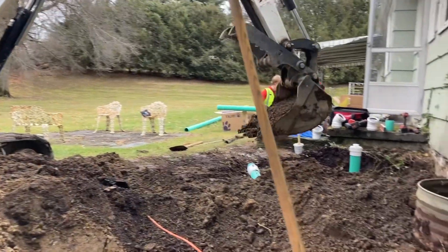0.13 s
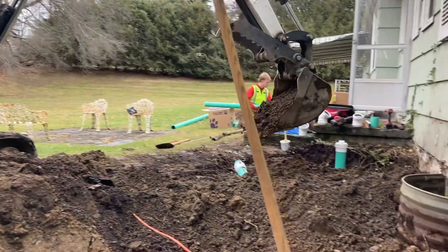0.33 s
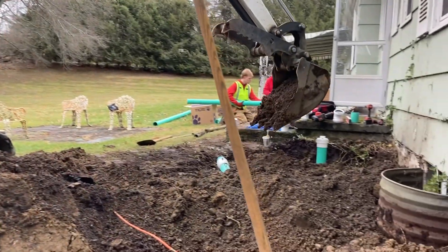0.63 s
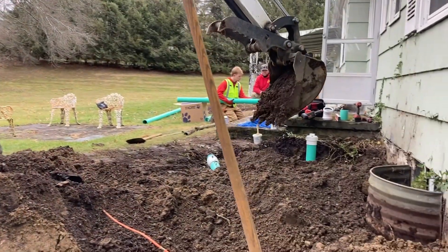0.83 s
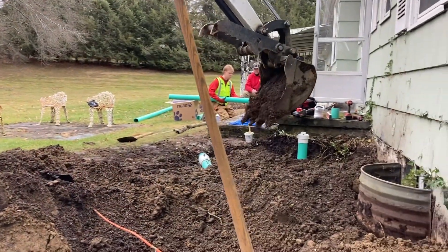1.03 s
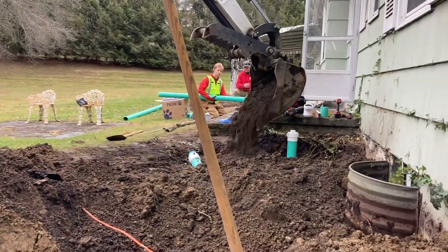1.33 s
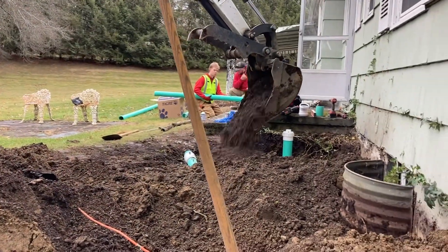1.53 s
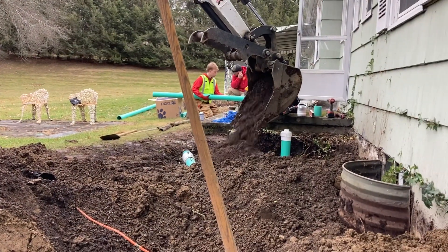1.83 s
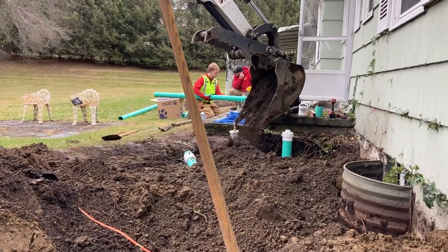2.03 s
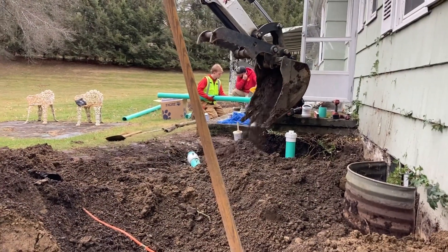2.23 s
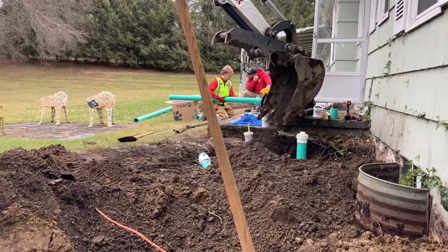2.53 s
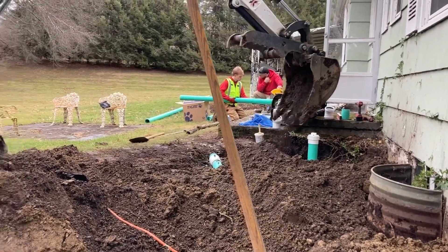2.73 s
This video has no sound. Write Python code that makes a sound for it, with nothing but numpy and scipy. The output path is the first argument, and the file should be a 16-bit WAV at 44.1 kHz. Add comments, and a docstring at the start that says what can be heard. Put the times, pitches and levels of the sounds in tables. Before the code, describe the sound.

A mini excavator's diesel engine runs throughout, with low unsteady boom, rumble, metallic clatter and a steady fan hum that rises slightly around 0.7-1.1 s. Bright hydraulic hiss and thin wavering whistles start almost at once, gaining a fast buzzing chatter from about 1 s. From 1.5 s damp soil patters onto a heap beside a house wall; heavy clods thud softly at 2.4-2.8 s.

```python
"""Mini excavator tipping soil

A mini excavator tips a bucket of soil beside a house wall. Its fan hums in steady tones over the boom of the
crank; noise bursts, housing drones and panel rings make the diesel rumble and clatter. Oil hisses and whistles
through a valve as flickering noise, with a chatter that deepens about a second in. Random clicks patter down
as soil, and a few heavy clods thud as short low rings with grit."""
import sys
import numpy as np
from scipy import signal
from scipy.fft import rfft, irfft
from scipy.io import wavfile
from scipy.ndimage import uniform_filter1d

SR = 44100
rng = np.random.default_rng(int(sys.argv[2]) if len(sys.argv) > 2 else 0)


def generate_wav(sig):
    """Save sig (samples, or channels by samples) to the path in sys.argv[1] as 16-bit PCM at SR."""
    pcm = np.round(np.clip(np.atleast_2d(sig).T, -1, 1) * 32767).astype(np.int16)
    wavfile.write(sys.argv[1], SR, pcm)


N = 127890
SIDES = np.array([[-1], [1]])  # left, right


def undb(db):
    """Decibels to gain."""
    return 10 ** (np.asarray(db) / 20)


def unit(x):
    """Scale to rms 1."""
    return x / np.sqrt(np.mean(x ** 2))


def curve(table):
    """The columns of a time table, sample by sample."""
    times, *cols = np.array(table, float).T
    return [np.interp(np.arange(N) / SR, times, c) for c in cols]


def by_pitch(table):
    """The columns of a frequency table, bin by bin."""
    hz, *cols = np.array(table, float).T
    bin_hz = np.arange(N // 2 + 1) * SR / N
    return [np.interp(np.log(bin_hz + 1), np.log(hz), c) for c in cols]


def colour(x, spectrum):
    """Filter by a spectrum; rms 1."""
    return unit(irfft(rfft(x) * undb(by_pitch(spectrum)[0]), N))


def walk(rate):
    """Random levels held 1 / rate s and smoothed twice; spread 1."""
    k = max(int(SR / rate), 1)
    held = np.repeat(rng.standard_normal(N // k + 2), k)
    return unit(uniform_filter1d(uniform_filter1d(held, k), k)[:N])


def ears(pair, table):
    """Two unrelated signals become left and right with a given balance, phase and likeness."""
    tilt_db, lead, likeness = by_pitch(table)
    likeness = np.clip(likeness, 0, 1)
    a, b = rfft(pair)
    both = np.sqrt(1 + likeness) * a + SIDES * np.sqrt(1 - likeness) * b
    return irfft(both * undb(SIDES * tilt_db / 2) * np.exp(-.5j * SIDES * lead), N)


def echoes(x, table):
    """Add delayed copies from nearby hard surfaces, scaled to leave the mean power gain at 1."""
    hz = np.arange(N + 1) * SR / (2 * N)  # double length, so that echoes do not wrap round
    response = 1 + sum(undb(db) * np.exp(-2j * np.pi * hz * delay) for delay, db in table)
    response = response / np.sqrt(np.mean(abs(response) ** 2))
    return irfft(rfft(x, 2 * N) * response)[:, :N]


def tones(hz, table, flutter_db):
    """Multiples of a rotation rate, each fluttering on its own, left and right."""
    phase = 2 * np.pi * np.cumsum(hz) / SR
    out = 0
    for multiple, db, tilt_db, lead in table:
        level = undb(db + SIDES * tilt_db / 2 + flutter_db * walk(22.13))
        out = out + level * np.sin(round(multiple) * phase - SIDES * lead / 2)
    return np.sqrt(2) * out


def resonance(centre_hz, width_hz, wander=0):
    """Two noises ringing in a narrow resonance whose centre may move; rms 1."""
    lowpass = signal.butter(2, width_hz / 2, fs=SR, output="sos")
    noise = rng.standard_normal((2, 2, N + SR // 4))
    narrow = signal.sosfilt(lowpass, noise)[..., -N:]  # drop the filter's start-up
    phase = 2 * np.pi * np.cumsum(centre_hz * (1 + wander * walk(7))) / SR
    return unit(narrow[0] * np.sin(phase) + narrow[1] * np.cos(phase))


# fan level: t/s, level/dB
FAN_DB = [(0, -31.5), (.7, -31.5), (.85, -27), (1.15, -29.5), (1.36, -26), (2.2, -26.5), (2.8, -25.5),
          (2.9, -27)]
# fan harmonics: multiple of the blade rate, level/dB, right ear louder by/dB, left ear leads by/rad
FAN_TONES = [(1, 0.5, 4.5, 0.53), (2, -13, -2, 2.23)]
FAN_FLUTTER_DB = 0.6


def fan(blade_hz):
    """Cooling fan: each passing blade pushes the air, which hums at the blade rate and its octave."""
    return tones(blade_hz, FAN_TONES, FAN_FLUTTER_DB) * undb(curve(FAN_DB)[0])


# low boom around twice the turn rate: t/s, level/dB
BOOM_DB = [(0, -34), (.3, -36), (.6, -28.5), (.75, -42), (.95, -29.5), (1.08, -36), (1.3, -33), (1.65, -35),
           (1.78, -32.5), (1.95, -29), (2.22, -36), (2.36, -29), (2.55, -36), (2.9, -28.5)]
# higher crank orders: multiple of the turn rate, level/dB, right ear louder by/dB, left ear leads by/rad
CRANK_TONES = [(5, -40.5, -1, .13), (8, -50.5, 1, .5), (9, -52, -3, .8), (18, -56, -5, 1.5)]
BOOM_WAVER = 0.022  # spread, as a fraction of pitch
BOOM_RIGHT_DB, CRANK_FLUTTER_DB = 3, 2


def crank(turn_hz):
    """The shaking engine block: an unsteady boom and a few weak higher orders."""
    wavering_hz = turn_hz * (1 + BOOM_WAVER * walk(16.1))
    boom = tones(wavering_hz, [(2, 0, BOOM_RIGHT_DB, 0.0041)], CRANK_FLUTTER_DB)
    return boom * undb(curve(BOOM_DB)[0]) + tones(turn_hz, CRANK_TONES, CRANK_FLUTTER_DB)


# housing drones: t/s, low drone level/dB, high drone level/dB
DRONE_DB = [(0, -41, -47), (.16, -42, -34), (.35, -41, -49), (.7, -45, -39), (1.1, -45, -53),
            (1.5, -38.5, -45), (1.8, -54, -37), (1.95, -46, -53), (2.5, -42, -39), (2.66, -32, -42),
            (2.75, -51, -32), (2.9, -41, -39)]
# ringing engine panels: f/Hz, level/dB against the clatter
PANEL_RINGS = [(893, -10.5), (1238, -13), (1432, -13.5), (1690, -16.5), (1920, -17), (2385, -20),
               (2660, -17.5), (2910, -18)]
# clatter level, which the panels follow too: t/s, level/dB
CLATTER_DB = [(0, -40), (.8, -37), (1.5, -38), (1.9, -36.5), (2.4, -35), (2.9, -35)]
# stereo image of engine and soil: f/Hz, right ear louder by/dB, left ear leads by/rad, likeness/0-1
ENGINE_EARS = [(30, 1, 0, .99), (80, 1.4, 0, .99), (165, -1, 0, .98), (260, 2, .5, .95), (420, -3, .7, .85),
               (680, -4.5, 2.1, .75), (1100, -2.5, 2.6, .65), (1400, -2, 3.6, .65), (1900, -2, 5.4, .6),
               (2600, -1, 6.1, .6), (3500, -1, 9, .5), (5000, 0, 7, .3)]
LOW_DRONE, HIGH_DRONE = (430, 33), (685, 75)  # centre/Hz, width/Hz
RING_WIDTH_HZ = 20
DRONE_WANDER, RING_WANDER = .03, .008  # spread, as a fraction of pitch


def housing():
    """The engine's housing drones in two wandering resonances and its panels ring thinly."""
    low_db, high_db = curve(DRONE_DB)
    low = resonance(*LOW_DRONE, DRONE_WANDER) * undb(low_db)
    high = resonance(*HIGH_DRONE, DRONE_WANDER) * undb(high_db)
    rings = sum(undb(db) * resonance(hz, RING_WIDTH_HZ, RING_WANDER) for hz, db in PANEL_RINGS)
    return ears(low + high + rings * undb(curve(CLATTER_DB)[0]), ENGINE_EARS) / np.sqrt(2)


# engine rumble spectrum: f/Hz, level/dB per Hz (relative)
RUMBLE = [(22, -36), (36, -22), (50, -3), (66, 0.5), (100, -5.5), (118, -11), (136, -1), (168, -11),
          (210, -2), (255, 2.5), (320, -9.5), (360, -10.5), (425, -6), (475, -10), (530, -19), (600, -10),
          (700, -6.5), (800, -17), (920, -12.5), (1200, -40.5), (2500, -65)]
# rumble level: t/s, level/dB
RUMBLE_DB = [(0, -30.5), (.7, -28), (.9, -27.5), (2.1, -27), (2.4, -27.5), (2.9, -28.5)]
# injector and valve-gear clatter spectrum: f/Hz, level/dB per Hz (relative)
CLATTER = [(400, -22), (800, -4.5), (1100, 3), (1800, -4), (2700, -5), (3500, -8.5), (5000, -12),
           (8000, -19), (15000, -71)]
# echoes off the house wall and ground, for clatter and soil: delay t/s, level/dB
WALL = [(.00415, -14), (.006, -20), (.017, -17)]
FIRINGS_PER_TURN = 1.5
KNOCK_DECAY, KNOCK_SCATTER_DB = 0.15, 5  # decay in firing periods
RUMBLE_KNOCK, CLATTER_KNOCK = 0.45, 0.49  # how far each firing lifts the noise
CLATTER_REPEAT = 0.38  # amplitude of the rattle that is alike in every engine cycle


def diesel(turn_hz):
    """Each uneven firing throws a burst of noise into the housing's resonances and rattles the valve gear."""
    firings = np.cumsum(turn_hz * FIRINGS_PER_TURN) / SR
    sizes = undb(KNOCK_SCATTER_DB * rng.standard_normal(N // 100))
    knock = sizes[firings.astype(int)] * np.exp(-(firings % 1) / KNOCK_DECAY)

    rumble = rng.standard_normal((2, N)) * (1 + RUMBLE_KNOCK * knock)
    rumble = colour(ears(rumble, ENGINE_EARS), RUMBLE)

    turns_into_cycle = firings / FIRINGS_PER_TURN % 2  # an engine cycle lasts two turns
    place = (turns_into_cycle * SR / turn_hz.mean()).astype(int)
    repeating = rng.standard_normal((2, N))[:, place]
    rattle = rng.standard_normal((2, N)) + CLATTER_REPEAT * repeating
    rattle = echoes(rattle * (1 + CLATTER_KNOCK * knock), WALL)
    clatter = colour(ears(rattle, ENGINE_EARS), CLATTER)
    return rumble * undb(curve(RUMBLE_DB)[0]) + clatter * undb(curve(CLATTER_DB)[0])


# oil hiss spectrum: f/Hz, level/dB per Hz (relative)
HISS = [(2500, -16), (4200, -10), (5400, -7.5), (6400, -3), (7300, -1), (8400, 1.3), (9900, 2),
        (11000, -.5), (12200, -3.5), (14000, -8), (15800, -15.5)]
JET_BAND_HZ, JET_FLICKER_DB, JET_FLICKER_PER_S = 170, 2.1, 9


def jet():
    """Turbulent oil: narrow hiss bands, dealt into up to 24 groups that each swell and fade on their own."""
    noise = rfft(colour(rng.standard_normal((2, N)), HISS))
    band = (np.arange(N // 2 + 1) * SR / N / JET_BAND_HZ).astype(int)
    groups = rng.integers(0, 24, band.max() + 1)[band]
    out = 0
    for k in np.unique(groups):
        flicker = undb(JET_FLICKER_DB * walk(JET_FLICKER_PER_S))
        out = out + irfft(noise * (groups == k), N) * flicker
    return unit(out)


# whistles of the oil jet: middle t/s, length t/s (between the 1/e points), f/Hz, peak level/dB
WHISTLES = [(.43, .16, 3940, -51), (.42, .14, 4500, -52), (.43, .18, 5510, -46), (.44, .14, 5880, -47),
            (.66, .12, 6000, -50), (.6, .6, 6850, -51), (1.5, .5, 7000, -46), (1.98, .4, 5780, -50),
            (2.2, .9, 6640, -46), (2.1, .7, 6940, -44), (2.33, .2, 7490, -43), (2.38, .14, 4800, -51),
            (2.84, .16, 7600, -41)]
WHISTLE_WIDTH_HZ = 77


def whistles():
    """The oil jet whistles: narrow noise bands that swell and fade in bell-shaped envelopes."""
    t = np.arange(N) / SR
    out = 0
    for middle, length, hz, db in WHISTLES:
        swell = np.exp(-(2 * (t - middle) / length) ** 2)
        out = out + undb(db) * swell * resonance(hz, WHISTLE_WIDTH_HZ)
    return out


# oil flow through the valve: t/s, hiss level/dB
FLOW = [(0, -59), (.02, -40), (.045, -35.5), (.11, -40.5), (.3, -34.5), (.43, -32.5), (.55, -38.5),
        (.67, -34), (.72, -41.5), (.76, -43), (.9, -37.5), (1.15, -35.5), (1.36, -38), (1.7, -34),
        (2.3, -34.5), (2.5, -33), (2.75, -33.5), (2.9, -31)]
# valve chatter: t/s, rate f/Hz, depth (exponent of the puffs)
CHATTER = [(0, 56.5, .14), (.88, 58.5, .1), (1.03, 58.5, .34), (1.25, 61, .32), (1.6, 61.2, .29),
           (1.85, 62, .42), (2.2, 62, .43), (2.5, 62.8, .4), (2.9, 62.9, .42)]
# the valve's whistling resonance: t/s, centre f/Hz, level/dB
SING = [(0, 7570, -61), (.42, 7844, -41), (.8, 7300, -50), (1.4, 7050, -67), (1.58, 6970, -48),
        (1.72, 7570, -41.5), (1.85, 7060, -46), (2.12, 6950, -42.5), (2.22, 7520, -46), (2.4, 7150, -40),
        (2.66, 7120, -51), (2.72, 7520, -43), (2.88, 7700, -45)]
# echoes of the oil off the boom, cab and wall: delay t/s, level/dB
PANELS = [(.0019, -18), (.0042, -14), (.0065, -15), (.0155, -11), (.017, -12), (.032, -15)]
# stereo image of the oil: f/Hz, right ear louder by/dB, left ear leads by/rad, likeness/0-1
HISS_EARS = [(3000, 0, 1, .3), (5000, 0, 1.8, .3), (5900, 3, 1.7, .55), (6900, 0, 0, .88),
             (7500, -.7, -.4, .88), (9200, 0, -3.14, .95), (10300, 0, -4.5, .78), (11400, 0, -6.28, .92),
             (12500, 0, -7.7, .72), (13700, 0, -9.42, .95), (15600, 0, -12.4, .8)]
SING_WIDTH_HZ, FLOW_FLUTTER_DB = 850, 0.9
CHATTER_WAVER = .004  # spread, as a fraction of the rate


def valve():
    """Oil hisses and whistles through a narrow gap, in regular puffs when the valve chatters."""
    rate, depth = curve(CHATTER)
    phase = 2 * np.pi * np.cumsum(rate * (1 + CHATTER_WAVER * walk(20))) / SR
    puffs = unit(np.exp(depth * np.cos(phase)))
    hiss = jet() * undb(curve(FLOW)[0] + FLOW_FLUTTER_DB * walk(18))
    centre_hz, sing_db = curve(SING)
    sing = resonance(centre_hz, SING_WIDTH_HZ) * undb(sing_db)
    oil = (hiss + sing + whistles()) * puffs
    return ears(echoes(oil, PANELS), HISS_EARS) / np.sqrt(2)


# soil leaving the bucket: t/s, level/dB
POUR = [(0, -64), (1.1, -60), (1.5, -39.5), (1.9, -37), (2.4, -36.5), (2.9, -50)]
# spectrum of crumbs landing: f/Hz, level/dB per Hz (relative)
SOIL = [(30, -35), (100, -10), (300, -5), (900, -1.5), (1600, 0.5), (2400, -13), (4000, -15), (10000, -35)]
CRUMBS_PER_S, CRUMB_SCATTER_DB = 900, 0.5  # rate in each of two streams


def soil():
    """Damp crumbs of many sizes patter onto the heap as random clicks."""
    landings = rng.random((2, N)) < CRUMBS_PER_S / SR
    crumbs = landings * rng.standard_normal((2, N))
    crumbs = crumbs * undb(CRUMB_SCATTER_DB * rng.standard_normal((2, N)))
    return colour(ears(echoes(crumbs, WALL), ENGINE_EARS), SOIL) * undb(curve(POUR)[0])


# clods that hit the heap: t/s, level/dB, f/Hz
CLODS = [(2.391, -23.5, 235), (2.545, -25, 232), (2.738, -24, 206.6), (2.785, -26, 230)]
# spectrum of the grit in their thud: f/Hz, level/dB per Hz (relative)
THUD = [(25, -40), (60, -15), (150, -20), (210, 4.5), (260, 3), (350, -14), (900, -32), (3000, -51)]
THUD_RISE_S, THUD_GRIT_DB = 0.01, -7.5  # time to the peak; grit against the ring


def clods():
    """The last heavy lumps land with soft, dull thuds: a short low ring and a little grit."""
    grit = undb(THUD_GRIT_DB) * colour(rng.standard_normal(N), THUD)
    out = 0
    for start, db, hz in CLODS:
        age = np.maximum(np.arange(N) / SR - start, 0)
        swell = age / THUD_RISE_S * np.exp(1 - age / THUD_RISE_S)
        ring = np.sqrt(2) * np.sin(2 * np.pi * hz * age)
        out = out + undb(db) * swell * (ring + grit)
    return out


# cooling fan speed, which also sets the engine's: t/s, blade rate f/Hz
FAN = [(0, 286.6), (.68, 286.6), (.84, 293.4), (1.15, 296.8), (1.75, 297.4), (2.65, 296), (2.9, 292.5)]
BLADES_PER_TURN = 7.3  # fan blades passing per turn of the crank
SPEED_WAVER = .002  # spread, as a fraction of speed


def scene():
    """Fan and engine turn at one locked ratio; the valve feeds the bucket's ram; the soil falls."""
    blade_hz = curve(FAN)[0] * (1 + SPEED_WAVER * walk(15))
    turn_hz = blade_hz / BLADES_PER_TURN
    engine = crank(turn_hz) + housing() + diesel(turn_hz)
    return fan(blade_hz) + engine + valve() + soil() + clods()


TOP_HZ = 15850


def record(dry):
    """A steep low-pass cuts the top."""
    return signal.sosfilt(signal.ellip(10, .2, 80, TOP_HZ, fs=SR, output="sos"), dry)


dry = scene()
out = record(dry)
generate_wav(out)
```